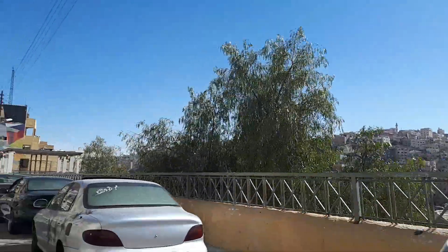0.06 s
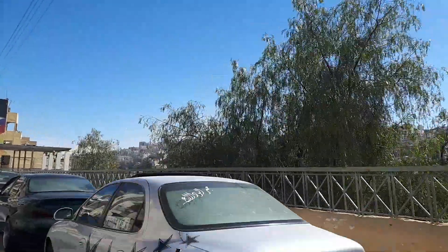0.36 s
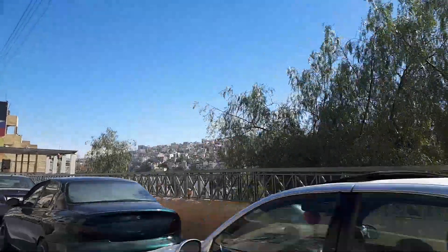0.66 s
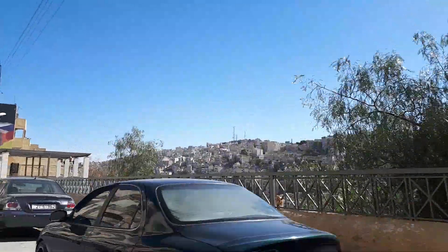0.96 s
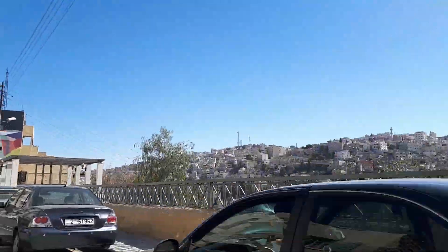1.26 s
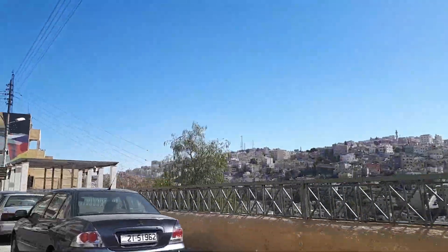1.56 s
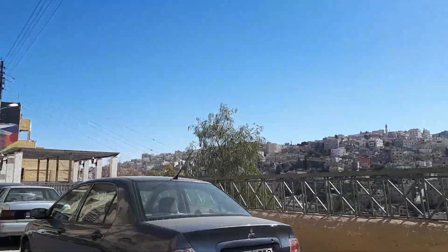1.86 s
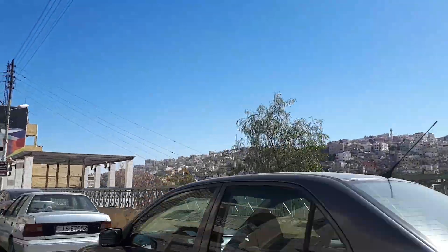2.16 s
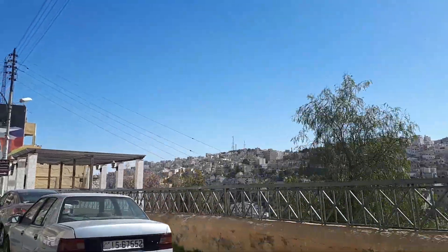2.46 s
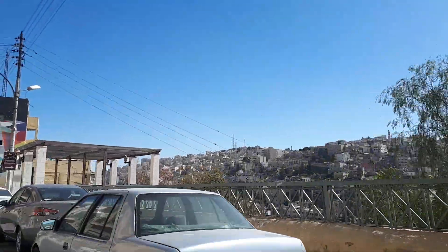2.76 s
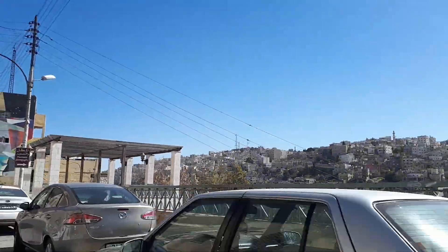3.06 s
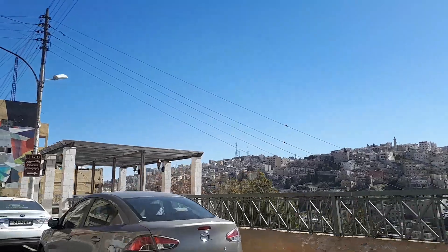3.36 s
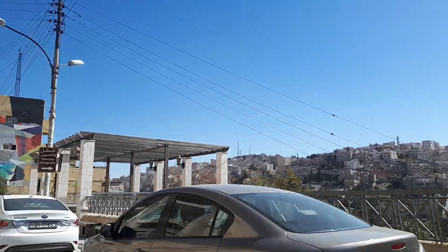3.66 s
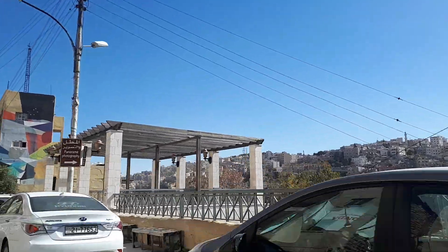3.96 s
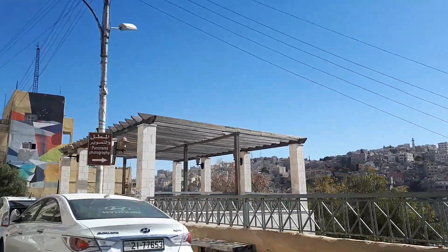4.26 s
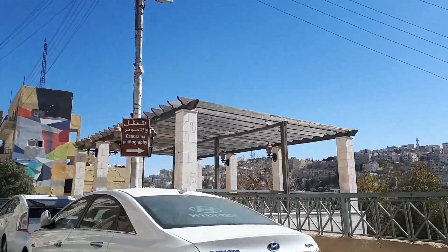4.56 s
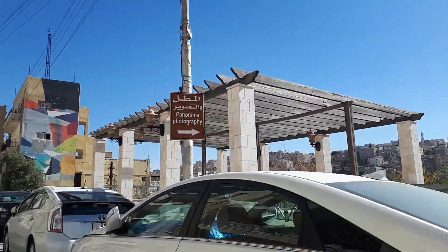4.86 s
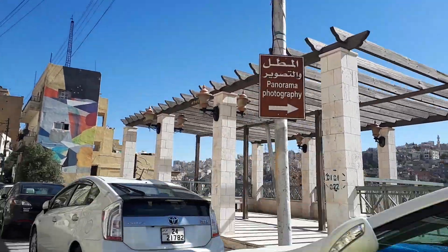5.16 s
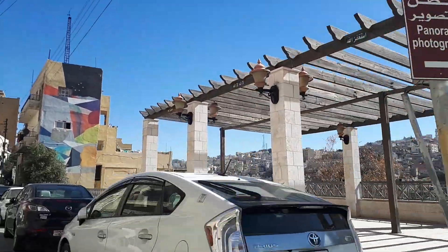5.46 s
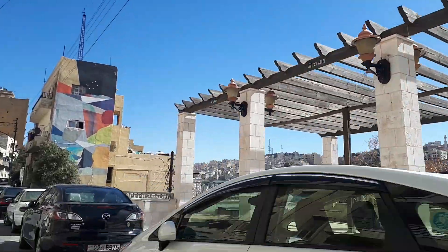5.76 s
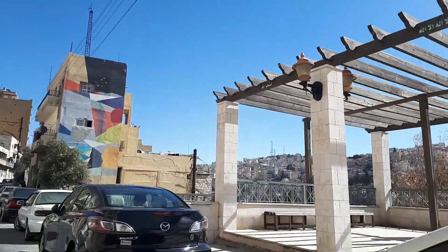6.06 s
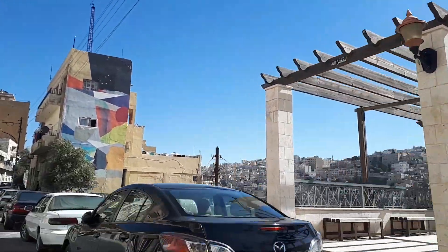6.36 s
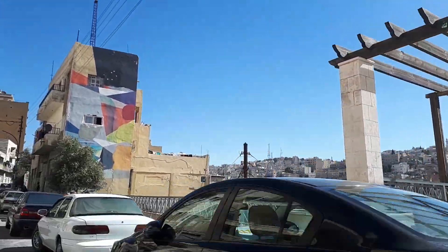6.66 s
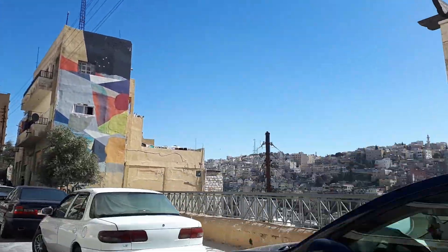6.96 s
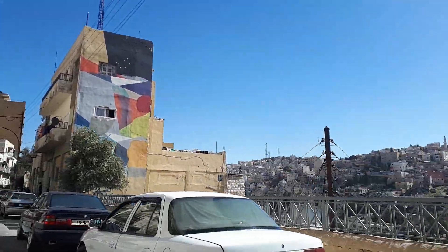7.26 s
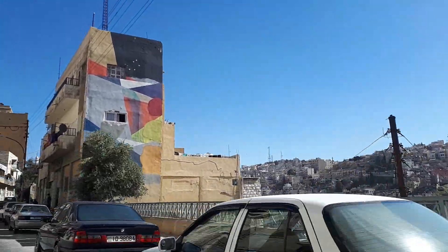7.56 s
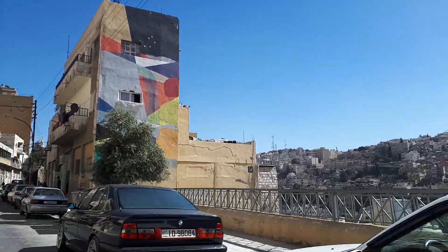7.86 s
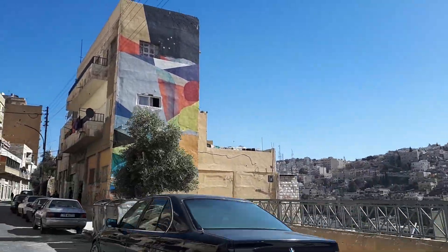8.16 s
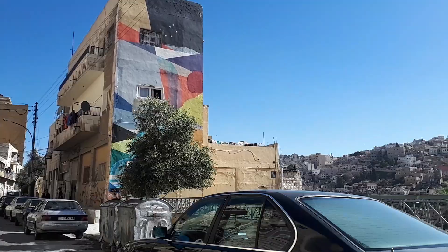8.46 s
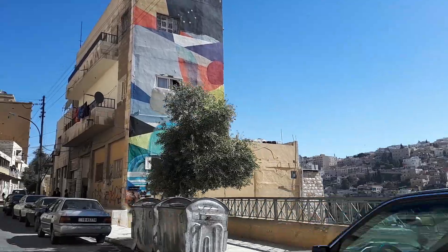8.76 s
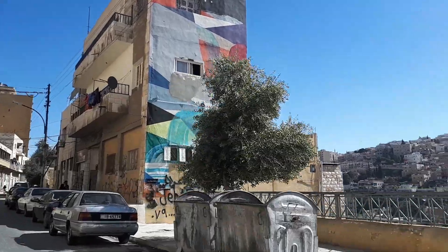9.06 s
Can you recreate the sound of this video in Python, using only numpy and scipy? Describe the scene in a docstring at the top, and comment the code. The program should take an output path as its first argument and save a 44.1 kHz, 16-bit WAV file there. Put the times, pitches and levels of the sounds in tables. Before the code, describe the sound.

From a car moving along a city street, rushing air makes a high, rough whistle on the left. It wavers in pitch, holds for up to about a second at a time, then breaks into short chirps before catching again. Wind buffets the microphone with uneven rumbles and small thumps, harder on the right. A steady low road roar and faint tyre hiss run underneath.

```python
"""A city street, from a car riding past parked cars with the slipstream blowing over the microphone.
On the left the air whistles across an edge: a rough squeal that wavers with the air speed and breaks
into chirps when the flow falters. Eddies buffet both microphone ports, the right one harder.
Underneath, the road roars, trim ticks, and tyre hiss swells as it comes back from the parked cars."""
import sys
import numpy as np
from scipy import signal
from scipy.fft import rfft, irfft, next_fast_len
from scipy.io import wavfile
from scipy.ndimage import uniform_filter1d

SR = 44100
rng = np.random.default_rng(int(sys.argv[2]) if len(sys.argv) > 2 else 0)


def generate_wav(signal):
    """Clip the signal to [-1, 1] and save it as 16-bit WAV at the path in sys.argv[1]."""
    frames = np.transpose(np.atleast_2d(signal))
    scaled = np.clip(frames, -1, 1) * 32767
    pcm = np.round(scaled).astype(np.int16)
    wavfile.write(sys.argv[1], SR, pcm)


N = 402191
TIME = np.arange(N) / SR
USUAL_HZ = 1600   # the whistle's home pitch
# colour of rushing air: (frequency [Hz], relative level [dB])
AIR_RUSH = [(150, -10), (400, 4), (1000, 8.5), (1400, 8.5), (2100, 2), (2600, 8), (3300, -0.5), (3800, -10),
            (4400, -6), (6000, -38.5), (9000, -53)]


def squeal(wind_db, wander=.028, jitter=.01716, full_db=-8, rasp_ratio=1.14):
    """An edge tone: turbulence shakes its pitch and level; in fast air it locks and steadies."""
    # harmonics of the whistle at full swing: (multiple of the pitch, level [dB])
    harmonics = [(1, 0), (2, -15), (3, -30.5), (4, -46)]
    # colour of the hiss at the edge: (frequency [Hz], relative level [dB])
    air_hiss = [(1500, -1.5), (3300, 18), (4500, 6.5), (6000, -1.5), (8000, -10), (10000, -21),
                (13000, -28), (16000, -34.5)]
    pitch, strength, hiss = airflow()
    slow_air = np.clip((1850 - pitch) / 350, 0, 1)
    gust = .658 * drift(63.3) + .75 * kicks(rate=80, decay_s=.00796)
    # larger vortices are shed about a hundred times a second and make the tone throb, on and off
    shedding = np.sin(phase_of(95 * (1 + .25 * drift(24.66))))
    throb = shedding * np.clip(.716 + .6 * drift(7.1), 0, 2)
    sway = wander * (.45 + .652 * slow_air) * gust + .028 * throb + jitter * drift(441)
    phase = phase_of(pitch * (1 + sway))
    # the air tears at the edge in spurts; between them the tone runs clean
    spurts = np.minimum(.77 * kicks(rate=170, decay_s=.0067) + .5 * gust + .5 * throb, 1.75)
    hard_wind = np.clip(wind_db + 33.5, 0, 20)
    # a feebly blown edge never locks, so weak chirps are mostly noise
    feeble = np.clip(1 - strength / from_db(full_db + 3.5), 0, 1)
    roughness = .2 * from_db(4.4 * spurts + hard_wind + 5.7 * feeble)
    # stray vortices add to the oscillation and now and then cancel it
    swirl = 1 + roughness * (drift(190) + 1j * drift(180))
    rough_phase = phase + .76 * np.arctan2(swirl.imag, abs(swirl.real))
    flutter_depth = -1.1 + 7 * (.35 * slow_air + .71 * feeble)
    flutter = from_db(flutter_depth * (.13 * gust + 1.9 * drift(96)))
    tremble = np.tanh(.84 * abs(swirl) * flutter) * from_db(.33 * throb)
    envelope = strength * tremble / np.sqrt(uniform_filter1d(tremble ** 2, size=1100) + 1e-9)
    # overtones grow with the swing
    swing = (envelope / from_db(full_db)) ** .33
    wave = sum(from_db(db) * swing ** (k - 1) * np.sin(k * rough_phase) for k, db in harmonics)
    tone = np.sqrt(2) * envelope * wave
    # smaller, faster vortices rasp just above the pitch
    skirt = np.real((drift(290) + 1j * drift(500)) * np.exp(1j * rasp_ratio * phase))
    rasp_gain = from_db(-9 + .97 * hard_wind + 2.7 * feeble) * strength ** .79 * hiss ** .44
    rasp = rasp_gain * skirt * rms_one(from_db(5.5 * spurts))
    rush_gain = from_db(-6.5 + 1.02 * hard_wind) * np.sqrt(strength * hiss)
    rush = rush_gain * noise(AIR_RUSH) * rms_one(from_db(2 * spurts))
    spray = from_db(8.5) * hiss * noise(air_hiss) * rms_one(from_db(4 * spurts))
    return filtered(tone + rasp, "low", 7500, order=3) + rush + spray


def airflow(catch_s=.0014, die_s=.0034, chirp_arch=.06, puffs_per_s=24):
    """Pitch, strength and hiss of the whistle: each note catches fast and rings out; chirps arch."""
    # sustained squeals, one curve each: (time [s], pitch [Hz], level [dB], hiss level [dB])
    squeals = [
        [(0.892, 1558, -16, -33), (1.012, 1650, -9, -33), (1.034, 1580, -10.5, -46), (1.084, 1710, -10, -29.5),
         (1.113, 1616, -12, -38.5), (1.215, 1860, -10, -29.5), (1.287, 1898, -7.5, -31.5),
         (1.489, 1837, -9.5, -33.5), (1.54, 1774, -9, -34.5), (1.62, 1835, -7.5, -32.5),
         (1.794, 1673, -11, -40.5)],
        [(2.975, 1470, -11, -40), (3.005, 1680, -9.5, -31.5), (3.077, 1588, -7.5, -35),
         (3.143, 1490, -17.5, -60), (3.187, 1607, -12.5, -57), (3.223, 1552, -17, -61), (3.259, 1566, -5, -38),
         (3.368, 1635, -12.5, -44)],
        [(3.52, 1810, -19.5, -58), (3.568, 1733, -5.5, -38), (3.65, 1600, -12, -51), (3.688, 1660, -22.5, -73),
         (3.73, 1600, -8.5, -63), (3.743, 1565, -19.5, -61)],
        [(3.895, 1525, -21.5, -63), (3.937, 1535, -10.5, -63), (3.949, 1628, -12.5, -53),
         (3.967, 1596, -11, -30.5), (4.035, 1698, -10.4, -47), (4.129, 1488, -13.5, -66)],
        [(4.965, 1742, -9, -51), (5.122, 1723, -8, -44), (5.174, 1636, -8.4, -48.5), (5.254, 1644, -7.4, -49.5),
         (5.426, 1975, -9, -40), (5.438, 1865, -9.5, -46), (5.543, 1818, -8, -49), (5.623, 1620, -11, -70),
         (5.649, 1734, -9.3, -43), (5.769, 1723, -11, -42), (5.835, 1543, -9, -69), (5.939, 1580, -9.5, -49),
         (5.992, 1460, -13, -54.5), (6.018, 1600, -9.5, -40), (6.138, 1522, -12, -48)],
        [(6.781, 1400, -10.5, -49), (6.91, 1396, -10, -62), (6.944, 1263, -15.4, -62), (6.966, 1368, -16, -63),
         (6.992, 1433, -10.5, -62.5), (7.11, 1564, -8.5, -45), (7.138, 1671, -10.5, -31),
         (7.309, 1770, -7, -36.5), (7.337, 1720, -6.7, -60), (7.351, 1794, -7.5, -38), (7.393, 1634, -9.5, -55)],
        [(7.441, 1660, -15.1, -64.5), (7.477, 1660, -6, -50), (7.519, 1947, -9.5, -40), (7.577, 1800, -12, -64),
         (7.585, 1589, -17.5, -69), (7.627, 1654, -9, -53), (7.75, 1425, -16, -69), (7.756, 1750, -10.5, -55),
         (7.806, 1478, -13, -62), (7.944, 1670, -8.5, -47.5), (7.958, 1502, -11, -73),
         (8.082, 1752, -12.0, -52)],
        [(8.766, 1520, -8, -53), (8.898, 1400, -14.5, -61), (8.916, 1543, -13, -40), (9.02, 1447, -9.5, -45),
         (9.055, 1352, -15.2, -58), (9.073, 1496, -13, -62), (9.117, 1420, -10, -50.5)],
    ]
    notes = [(curve, 0) for curve in squeals] + [(curve, chirp_arch) for curve in chirps()]
    pitch_sum, weight = np.full(N, USUAL_HZ * 1e-6), np.full(N, 1e-6)
    strength, hiss = np.zeros((2, N))
    for curve, arch in notes:
        start, end = curve[0][0], curve[-1][0]
        near = slice(max(0, int((start - .03) * SR)), int((end + .06) * SR))
        t = TIME[near]
        hz, level_db, hiss_db = follow(curve, t)
        gate = 1 / (1 + np.exp((start - t) / catch_s) + np.exp((t - end) / die_s - 1))
        place = np.clip(2 * (t - start) / (end - start) - 1, -1, 1)
        blow = gate * from_db(level_db)
        pitch_sum[near] += blow ** 2 * hz * (1 + arch * (1 / 3 - place ** 2))
        weight[near] += blow ** 2
        strength[near] = np.maximum(strength[near], blow)
        hiss[near] = np.maximum(hiss[near], gate * from_db(hiss_db))
    pitch = pitch_sum / weight   # where notes overlap, the louder one leads
    # the air arrives in uneven puffs that lift pitch and level together, more so when it is slow
    puffs = np.sin(phase_of(puffs_per_s * (1 + .4 * drift(12)))) * (USUAL_HZ / pitch) ** 2
    lost = stumbles()
    bend = 1 + .02216 * puffs - .05 * lost
    gain = from_db(.9 * puffs - 10.5 * lost)
    return pitch * bend, strength * gain, hiss * gain


def chirps(fall=.07, stray_count=30, hiss_db_per_hz=.0611):
    """Curves for single puffs: the pitch falls as the air is spent; high or loud ones hiss more."""
    # the whistle catching for one puff: (start [s], length [s], pitch [Hz], level [dB])
    puffs = [(0.07, .02, 1415, -20.5), (0.102, 0.045, 1720, -16.5), (0.159, .051, 1620, -11.5),
             (0.406, 0.011, 1600, -19.5), (0.604, .022, 1590, -27), (0.777, 0.041, 1570, -12.5),
             (0.831, 0.0067, 1610, -7.5), (0.876, .015, 1620, -22.5), (2.079, 0.014, 1480, -10),
             (2.155, 0.051, 1590, -12), (2.203, 0.026, 1710, -11.5), (2.637, 0.062, 1530, -19.5),
             (2.692, 0.059, 1520, -14), (2.748, .035, 1490, -18), (2.832, .024, 1450, -18),
             (2.893, 0.034, 1460, -18.5), (2.945, .018, 1540, -17.5), (3.436, 0.037, 1600, -15.5),
             (3.476, 0.037, 1670, -23), (3.78, 0.029, 1535, -22.5), (3.876, .013, 1460, -19.5),
             (4.215, .012, 1650, -16), (4.29, 0.0087, 1590, -9.5), (4.367, .011, 1710, -10),
             (4.386, .041, 1620, -13.5), (4.503, .014, 1690, -20.5), (4.607, .012, 1950, -10.5),
             (4.652, 0.015, 1670, -18.5), (4.936, 0.01, 1560, -13.5), (6.26, 0.013, 1330, -15),
             (6.294, 0.035, 1350, -17.5), (6.36, 0.0264, 1400, -22.5), (6.395, 0.019, 1400, -15.5),
             (6.528, 0.016, 1420, -21), (6.704, 0.017, 1230, -12), (6.743, .019, 1270, -13),
             (8.14, 0.01, 1400, -19), (8.183, .032, 1520, -13.5), (8.216, .03, 1380, -11.5),
             (8.27, .008, 1370, -16.5), (8.417, .01, 1289, -25.5), (8.667, 0.01, 1300, -11.5),
             (8.689, .026, 1261, -20), (8.737, .018, 1290, -17)]
    # feeble chirps come by chance among the others
    strays = [(when * N / SR, .012 * (.5 + length), 1480 * (.9 + .2 * high), -30 + 10 * (loud - .5))
              for when, length, high, loud in rng.random((stray_count, 4))]
    curves = []
    for start, length, hz, db in puffs + strays:
        hiss_db = db - 37.5 + hiss_db_per_hz * (hz - USUAL_HZ)
        curves.append([(start, hz * (1 + fall / 2), db, hiss_db),
                       (start + length, hz * (1 - fall / 2), db, hiss_db)])
    return curves


def stumbles():
    """A squeal loses its air for a moment: 0 is full flow, 1 the bottom of a dip."""
    # gaps in the flow: (time [s], length [s])
    gaps = [(0.976, 0.0078), (1.002, 0.013), (3.103, 0.014), (3.148, 0.017), (3.336, 0.014), (3.591, 0.026),
            (3.909, 0.007), (3.944, 0.012), (4.056, 0.008), (4.112, 0.0106), (4.987, 0.0084),
            (5.084, 0.024), (6.817, 0.011), (6.956, 0.016), (7.475, 0.0124), (7.577, 0.015), (7.679, 0.009),
            (7.756, 0.012), (7.786, 0.007), (7.816, 0.008), (7.959, 0.016), (9.065, 0.012)]
    lost = np.zeros(N)
    for s, length in gaps:
        near = slice(int((s - 2 * length) * SR), int((s + 2 * length) * SR))
        lost[near] += swell(TIME[near], s, .6 * length)
    return lost


def buffeting(level_db, bright_db, lump_db, crackle_db, eddy_rate):
    """Eddies hit a port one after another; the stronger the eddy, the higher its noise reaches."""
    # colour of wind on a port: (frequency [Hz], relative level [dB])
    rumble = [(35, -37.5), (50, -16.5), (80, -3), (130, 1), (220, -2), (350, -6), (600, -11.5),
              (1000, -18.5), (1600, -25.5), (2200, -35), (3200, -52), (4500, -61), (6000, -73)]
    eddies = 2.3 * np.tanh((1.2 * drift(eddy_rate) + .71 * kicks(eddy_rate, decay_s=.026)) / 2.5)
    wind = 0
    for hz, band in noise_bands(rumble):
        height = np.clip(np.log(hz / 220) / np.log(1400 / 220), 0, 1)
        lumps = rms_one(from_db((lump_db + crackle_db * height) * eddies))
        wind = wind + band * lumps * from_db(bright_db * height)
    # even out the mean force of the wind over many eddies
    mean_force = np.sqrt(uniform_filter1d(wind ** 2, size=3000) + 1e-12)
    return filtered(from_db(level_db) * wind / mean_force ** .32, "low", 4500, order=4)


def thumps(port, edge_db):
    """A hard eddy is one short pressure swing with a ragged edge."""
    # single hard eddies: (time [s], level [dB], centre frequency [Hz], port)
    hits = [(0.017, -4, 313, "left"), (0.098, -0.5, 490, "left"), (0.153, 1.5, 470, "left"),
            (0.395, -8, 556, "left"), (0.409, -2.5, 990, "left"), (0.414, 2.5, 425, "left"),
            (1.494, 2, 548, "right"), (1.862, -2, 671, "right"), (2.389, -1, 499.7, "right"),
            (2.947, -4, 354.4, "right"), (3.836, -1.5, 580, "right"), (4.27, 3, 644.6, "right"),
            (4.338, -4, 597, "right"), (4.563, 1, 1094, "left"), (4.589, -8, 605, "left"),
            (4.622, -6.5, 369, "left"), (4.659, -5.5, 281, "left"), (4.811, -5.5, 415, "right"),
            (5.386, -3.5, 697, "right"), (6.286, -3, 423, "right"), (6.74, -6, 478.5, "right"),
            (6.793, -4.5, 862, "left"), (7.511, -1.5, 540, "right"), (7.575, -3.5, 639.7, "left"),
            (8.714, -3.5, 543.2, "right"), (8.83, -2.5, 784, "right")]
    out, ragged = np.zeros(N), noise(AIR_RUSH)
    for s, db, hz, side in hits:
        if side == port:
            near = np.flatnonzero(abs(TIME - s) < .012)
            cycles = (TIME[near] - s) * hz
            wave = np.sin(2 * np.pi * (cycles + rng.random())) + from_db(edge_db) * ragged[near]
            out[near] += from_db(db) * swell(cycles, 0, .38) * wave
    return out


def road(pass_s=.26):
    """Steady roar of the rolling car, and tyre hiss thrown back by each parked car."""
    # colour of the road roar: (frequency [Hz], relative level [dB])
    road_roar = [(30, -13.5), (100, 7), (300, 6), (700, -28.5), (1100, -7), (1600, -5), (2050, -9),
                 (2300, -17.5), (3200, -22), (4200, -36), (6000, -60.5)]
    # colour of the tyre hiss: (frequency [Hz], relative level [dB])
    tyre_hiss = [(2000, 4), (4200, 5), (5700, -6.5), (6800, -1.5), (8400, -1.5), (9200, -8.5), (12200, -8),
                 (13300, -12.5), (16000, -20)]
    # parked cars going by: (time [s], reflection level [dB])
    parked_cars = [(0.05, -60.5), (0.76, -59), (1.5, -63), (2.42, -60), (3.3, -59.5), (4.15, -60.5),
                   (5.0, -58), (6.149, -64), (6.98, -62.5), (7.9, -69.5), (8.92, -61)]
    reflected_power = sum(from_db(db) ** 2 * swell(TIME, s, pass_s) for s, db in parked_cars)
    hiss_gain = np.sqrt(from_db(-67.5) ** 2 + reflected_power)   # a little hiss stays between cars
    roar = from_db([[-37], [-36]]) * np.array([noise(road_roar), noise(road_roar)])
    hiss = hiss_gain * from_db([[2.5], [5.5]]) * np.array([noise(tyre_hiss), noise(tyre_hiss)])
    return roar + hiss


def rattles(decay_s=.0062, band_hz=(4500, 13000)):
    """Loose trim ticks: a bright snap that dies at once."""
    # small rattles in the car: (time [s], level [dB])
    ticks = [(1.491, -48), (4.806, -39), (6.213, -50), (6.232, -46), (6.607, -45)]
    snaps = np.zeros(N)
    for s, db in ticks:
        snaps[round(s * SR)] = from_db(db)
    fizz = filtered(rng.standard_normal((2, N)), "band", band_hz, order=2)
    return from_db(-1.5) * die_away(snaps, decay_s) * fizz


def kicks(rate, decay_s):
    """Vortices arrive at random, each a quick swell that dies away; mean 0, spread 1."""
    births = (rng.random(N) < rate / SR) * (.5 + rng.random(N))
    train = die_away(births, decay_s)
    train = uniform_filter1d(uniform_filter1d(train, size=50), size=50)
    return rms_one(train - train.mean())


def drift(rate):
    """Smooth random wobble with spread 1, changing at about this rate per second."""
    pole = np.exp(-16 * np.pi * rate / SR)
    slow = signal.lfilter([1], [1, -2 * pole, pole * pole], rng.standard_normal(N // 8 + 4002))[4000:]
    return np.interp(np.arange(N) / 8, np.arange(len(slow)), rms_one(slow))


def noise_bands(spectrum):
    """Half-octave bands of noise as (centre [Hz], band), with a total rms of 1."""
    points_hz, points_db = np.transpose(spectrum)
    edges = 22 * 2 ** (np.arange(20) / 2)
    white, bands = rng.standard_normal((2, N)), []
    for k, (low, high) in enumerate(zip(edges, edges[1:])):
        hz = np.sqrt(low * high)
        if high > points_hz[0] and low < points_hz[-1]:
            gain = from_db(np.interp(np.log(hz), np.log(points_hz), points_db))
            bands.append((hz, gain * filtered(white[k % 2], "band", [low, high], order=3)))
    total = np.sqrt(sum(np.mean(band ** 2) for hz, band in bands))
    return [(hz, band / total) for hz, band in bands]


def noise(spectrum):
    """Steady noise of this colour, rms 1."""
    points_hz, points_db = np.transpose(spectrum)
    size = next_fast_len(N)
    hz = np.maximum(np.fft.rfftfreq(size, 1 / SR), 1)
    inside = np.clip(hz, points_hz[0], points_hz[-1])
    roll_off = np.minimum(hz / inside, inside / hz) ** 4
    gain = from_db(np.interp(np.log(hz), np.log(points_hz), points_db)) * roll_off
    return rms_one(irfft(gain * rfft(rng.standard_normal(size)), size)[:N])


def filtered(x, kind, hz, order):
    """Low-, high- or band-pass with a flat passband."""
    return signal.sosfilt(signal.butter(order, hz, kind, fs=SR, output="sos"), x)


def die_away(impulses, decay_s):
    """Give each impulse an exponential tail."""
    return signal.lfilter([1], [1, -np.exp(-1 / (decay_s * SR))], impulses + 1e-18)


def swell(t, centre, half_length):
    """A bell curve of height 1."""
    return np.exp(-((t - centre) / half_length) ** 2)


def follow(curve, t):
    """Each value column of a curve at the times t."""
    knots, *columns = np.transpose(curve)
    return [np.interp(t, knots, column) for column in columns]


def phase_of(hz):
    """Running phase of a moving frequency."""
    return 2 * np.pi * np.cumsum(hz) / SR


def from_db(db):
    """Decibels to gain."""
    return 10 ** (np.asarray(db) / 20)


def rms_one(x):
    """Scale to rms 1."""
    return x / np.sqrt(np.mean(x ** 2) + 1e-20)


def scene():
    """The whistle sits at the left port; each port has its own wind, which flickers by chance."""
    # wind on the left port: (time [s], level [dB])
    wind_left = [(0.0, -20), (0.19, -13), (0.3, -31), (0.4, -15), (0.51, -27.0), (1.84, -32.5), (1.93, -23),
                 (2.14, -30), (3.88, -32), (4.6, -18), (4.71, -22.5), (6.55, -32), (7.17, -23.5),
                 (7.26, -26), (7.57, -21.5), (7.89, -27), (8.29, -23), (8.59, -35), (8.91, -21.5),
                 (9.12, -27)]
    # wind on the right port: (time [s], level [dB], relative brightness [dB])
    wind_right = [(0.0, -30, -7), (0.19, -28, -16), (0.61, -18, -14), (1.84, -14.5, -11),
                  (2.04, -16, -16.5), (3.48, -11.5, -11.5), (4.5, -11.5, -13), (4.71, -22, -22),
                  (4.81, -10.5, -11), (5.11, -29, -23.5), (5.22, -13, -14), (5.52, -20, -4.5),
                  (5.62, -32, -19), (6.13, -18.5, -7.5), (6.45, -22, -21), (6.96, -16.5, -12),
                  (7.06, -21.5, -11.5), (7.47, -15, -11), (7.68, -29, -20), (7.77, -19, -9),
                  (8.19, -21, -15.5), (9.12, -17.5, -18)]
    left_db, = follow(wind_left, TIME)
    right_db, right_bright_db = follow(wind_right, TIME)
    whistle = squeal(left_db)
    left_flicker_db, right_flicker_db = 1.5 * drift(9), .8 * drift(9)
    left = buffeting(left_db + left_flicker_db - 1.5, bright_db=0,
                     lump_db=4, crackle_db=2.5, eddy_rate=92)
    right = buffeting(right_db + right_flicker_db - .3, bright_db=right_bright_db + right_flicker_db + 14,
                      lump_db=3.5, crackle_db=4.5, eddy_rate=99)
    left = left + thumps("left", edge_db=-8) + whistle
    right = right + thumps("right", edge_db=-27) + from_db(-51) * whistle
    return np.array([left, right]) + road() + rattles()


def record(dry, cutoff_hz=15800):
    """The deepest rumble is filtered out, the highest peaks are rounded and the top is cut."""
    trimmed = filtered(dry, "high", 42, order=3)
    rounded = trimmed / (1 + trimmed ** 10) ** (1 / 10)
    return signal.sosfilt(signal.ellip(10, .1, 80, cutoff_hz, fs=SR, output="sos"), rounded)


dry = scene()
out = record(dry)
generate_wav(out)
```